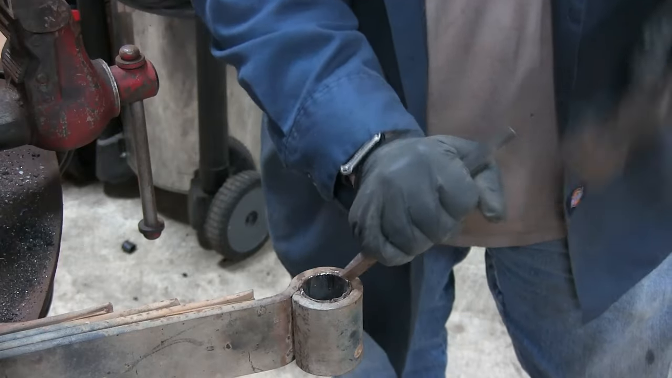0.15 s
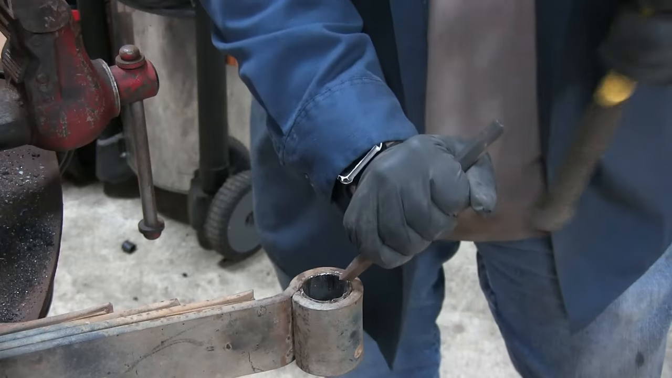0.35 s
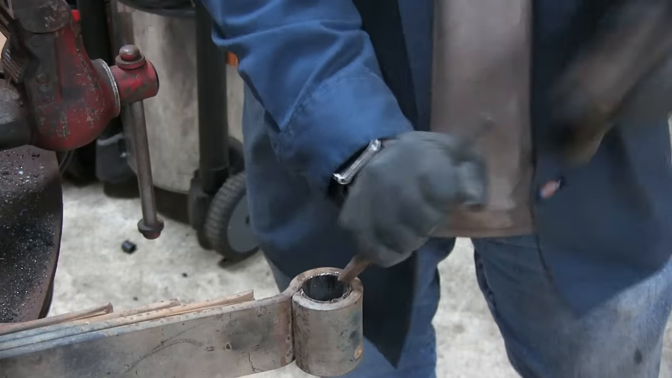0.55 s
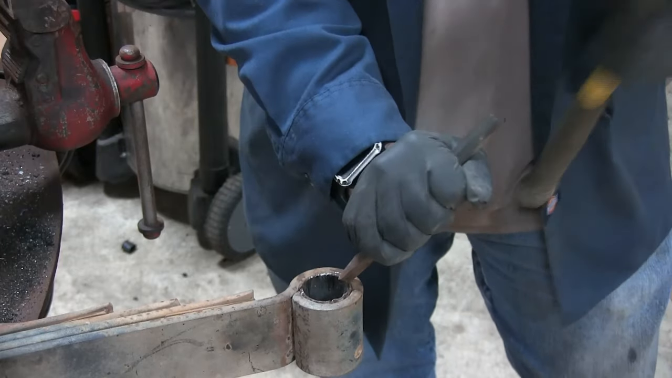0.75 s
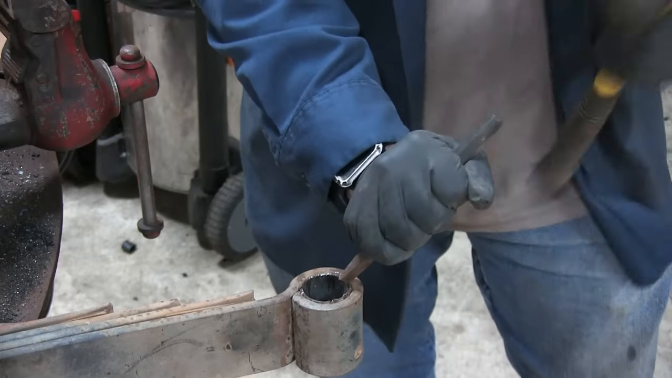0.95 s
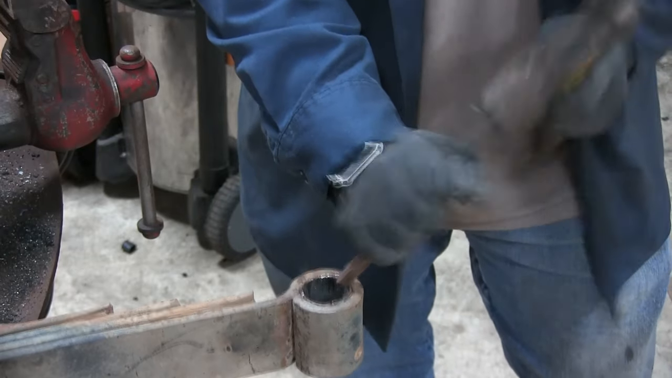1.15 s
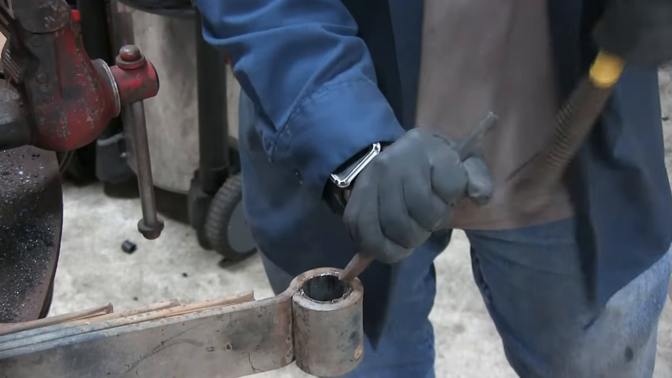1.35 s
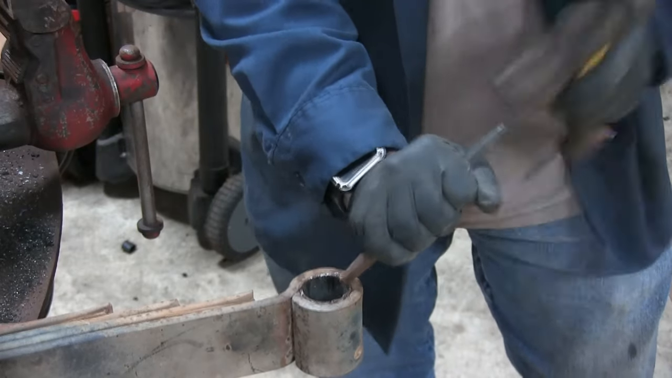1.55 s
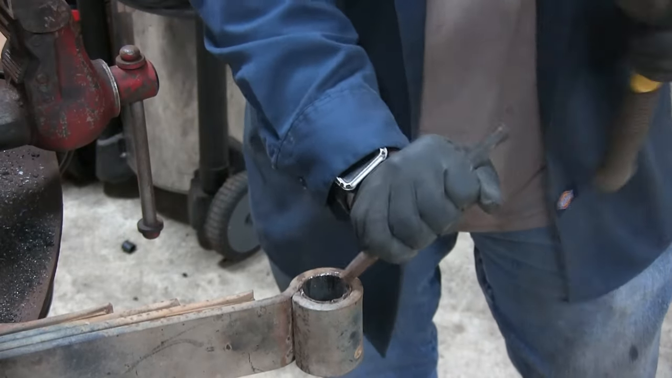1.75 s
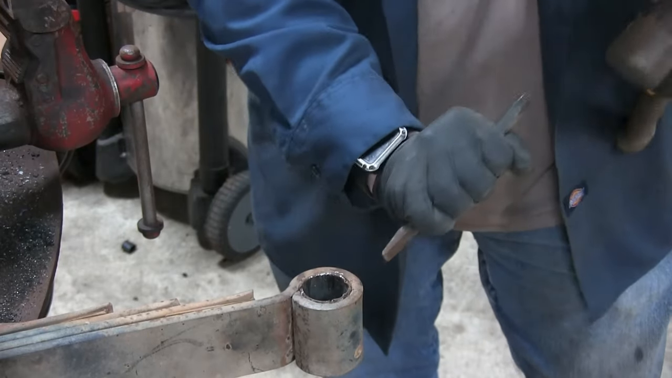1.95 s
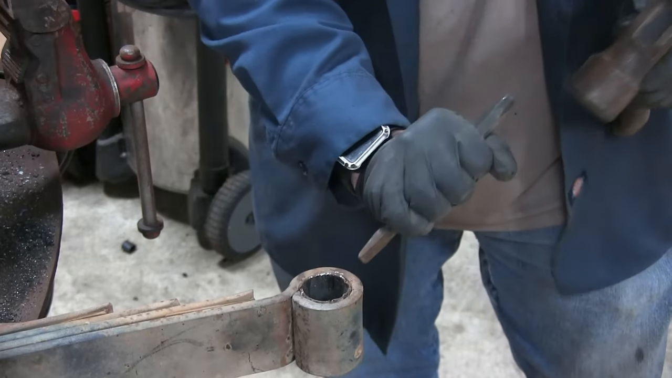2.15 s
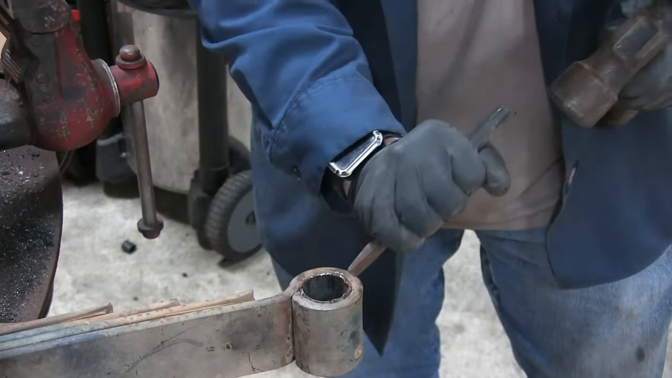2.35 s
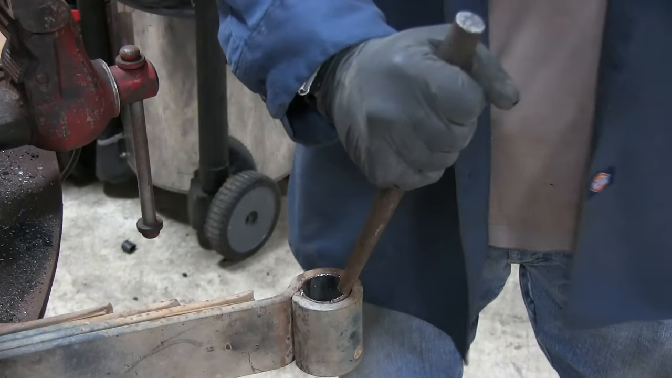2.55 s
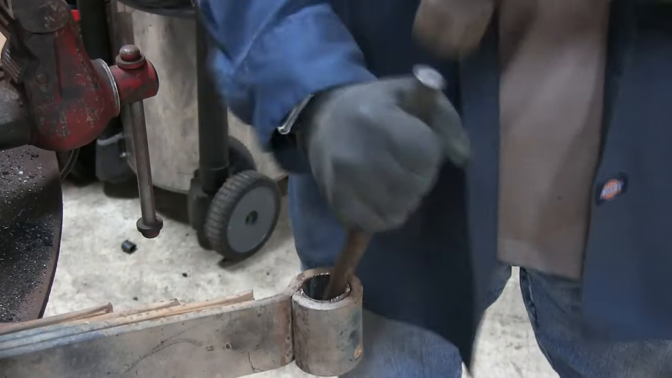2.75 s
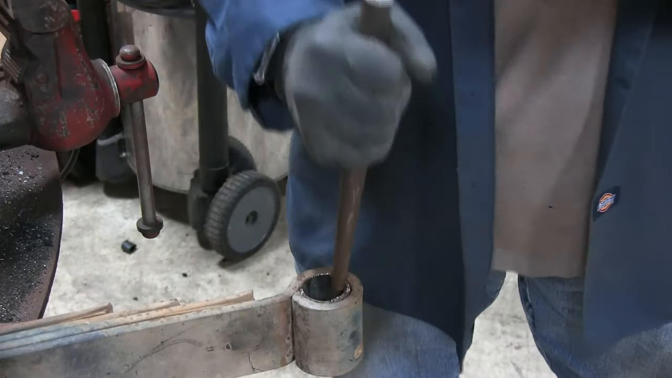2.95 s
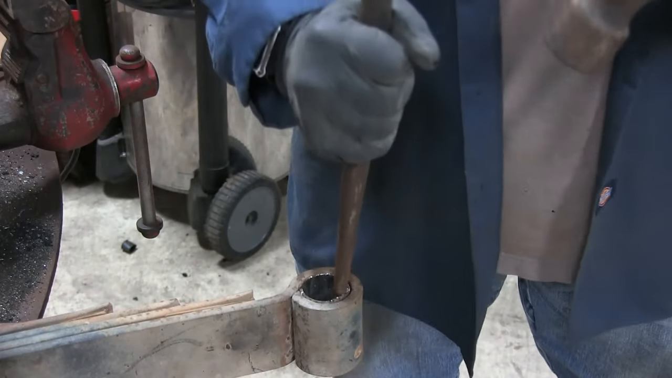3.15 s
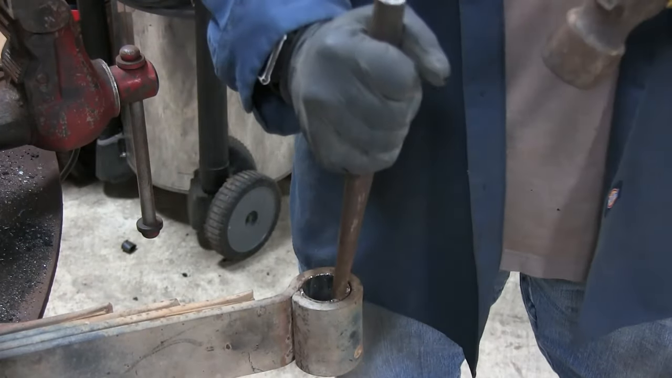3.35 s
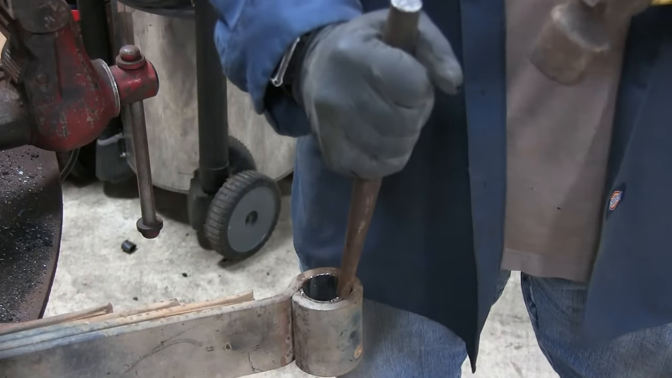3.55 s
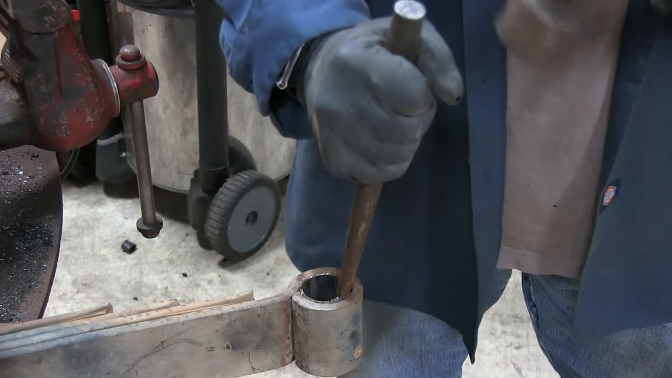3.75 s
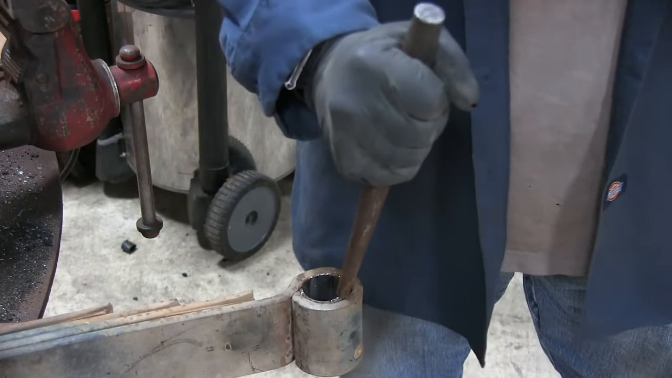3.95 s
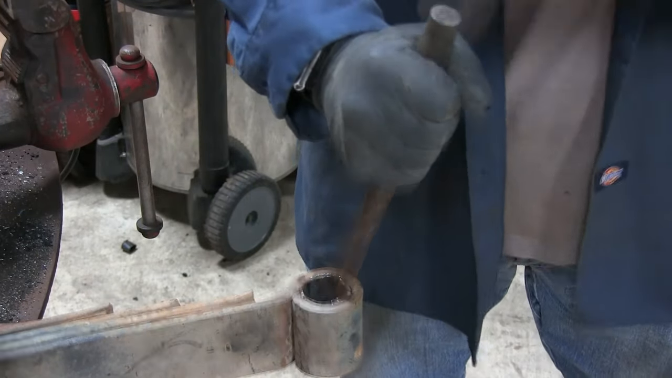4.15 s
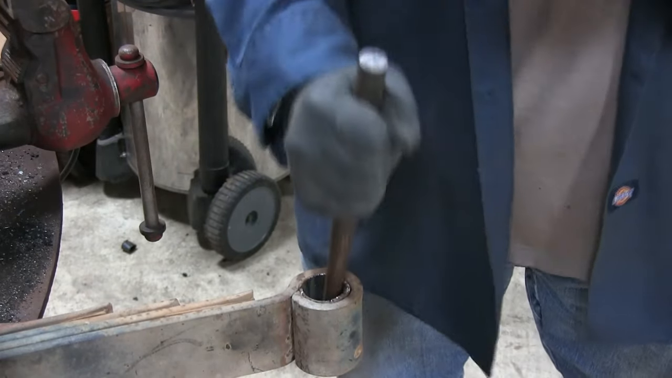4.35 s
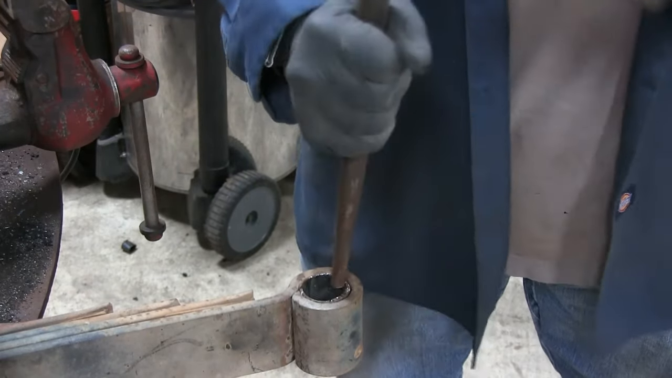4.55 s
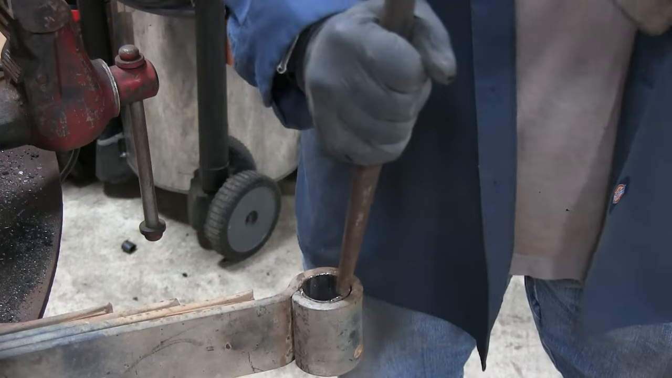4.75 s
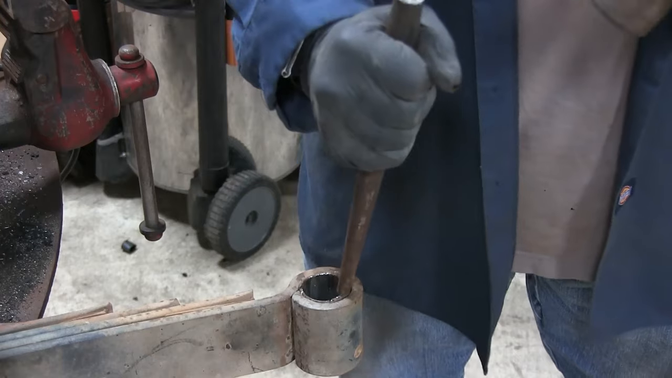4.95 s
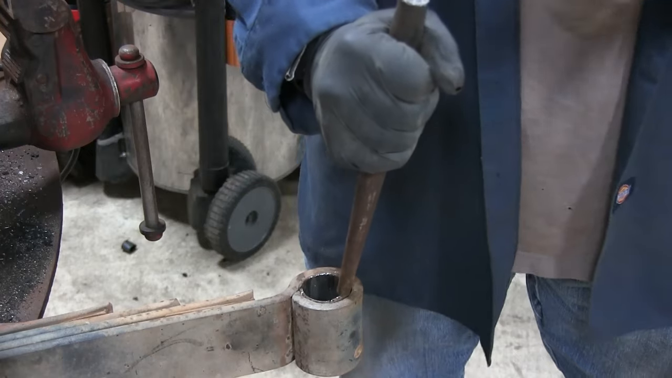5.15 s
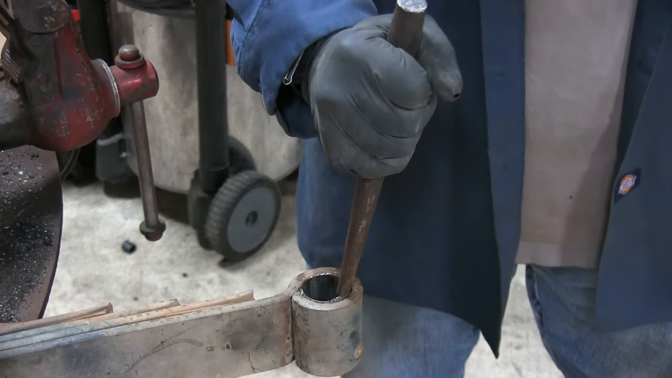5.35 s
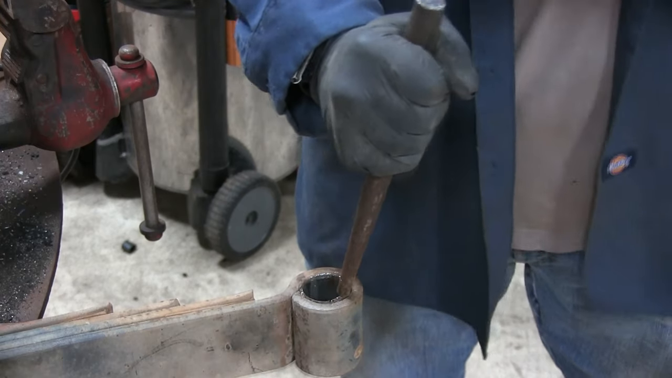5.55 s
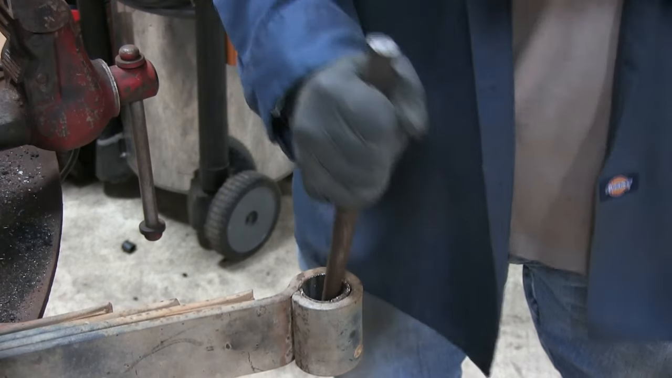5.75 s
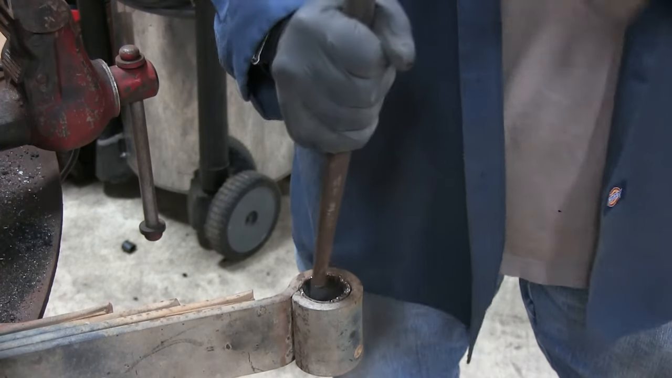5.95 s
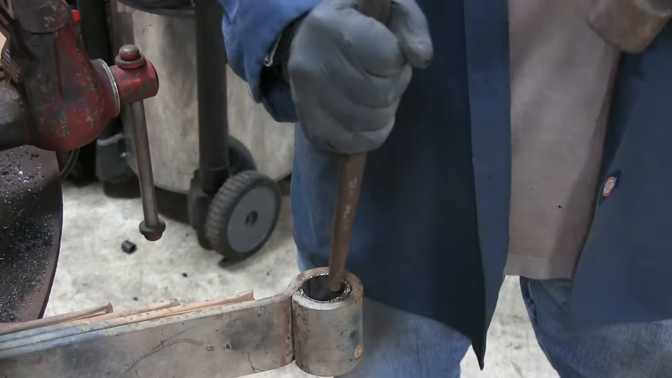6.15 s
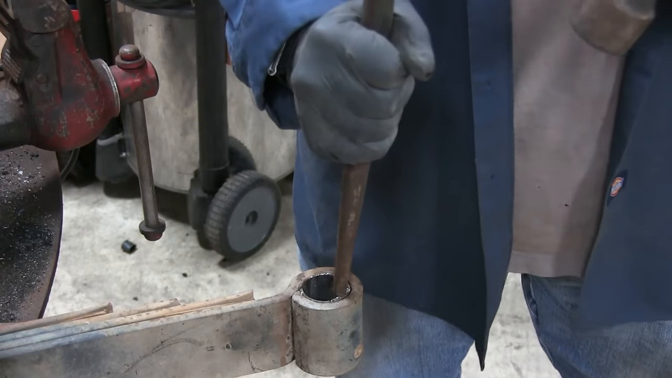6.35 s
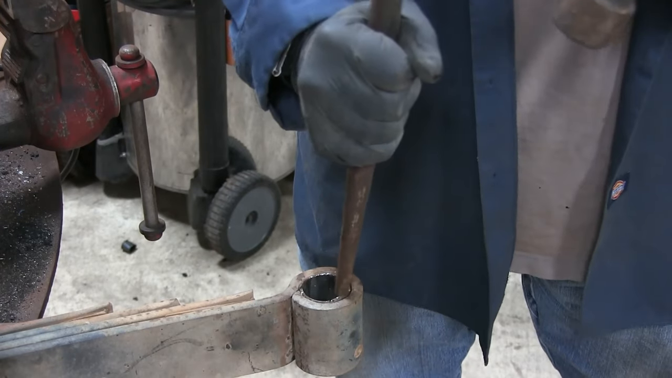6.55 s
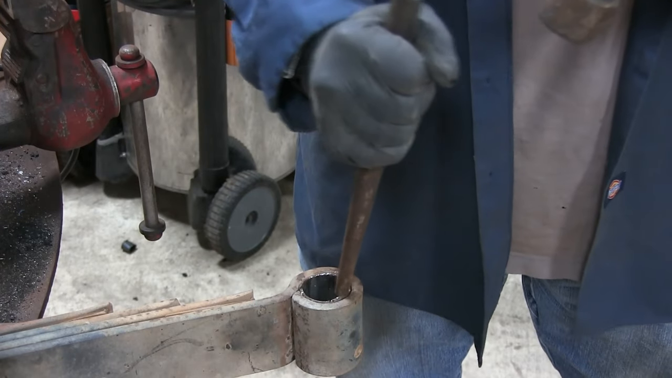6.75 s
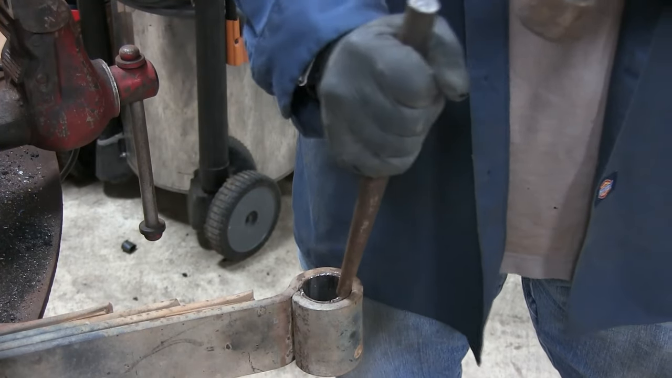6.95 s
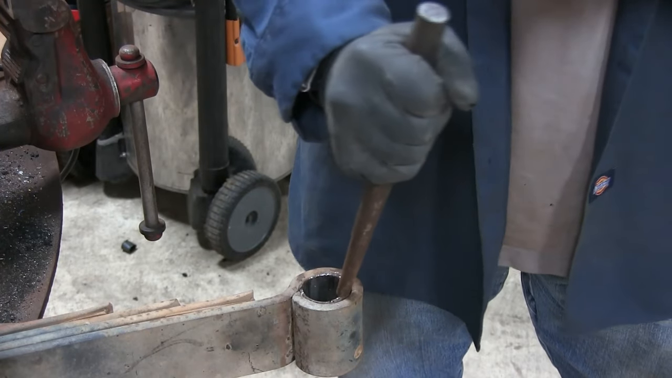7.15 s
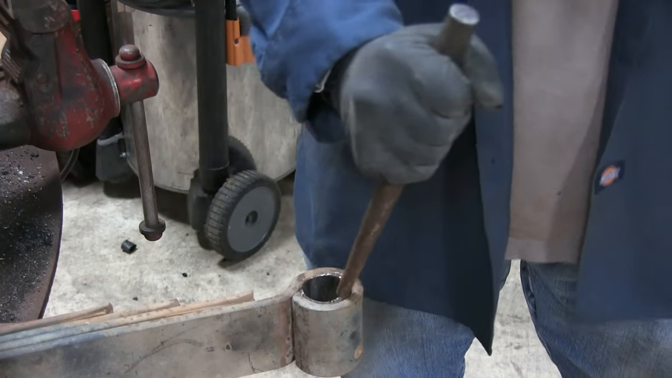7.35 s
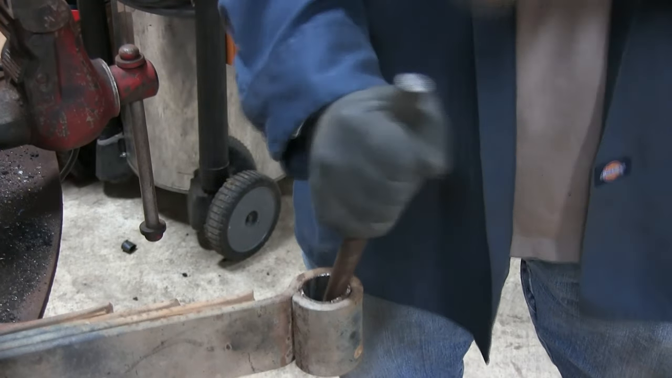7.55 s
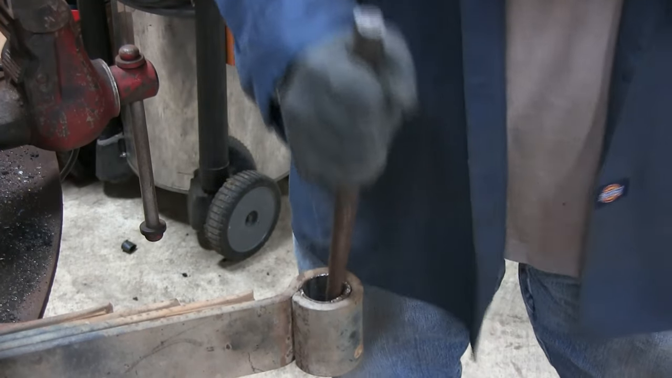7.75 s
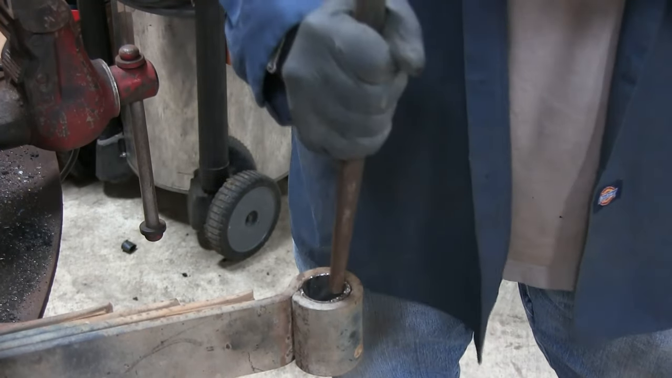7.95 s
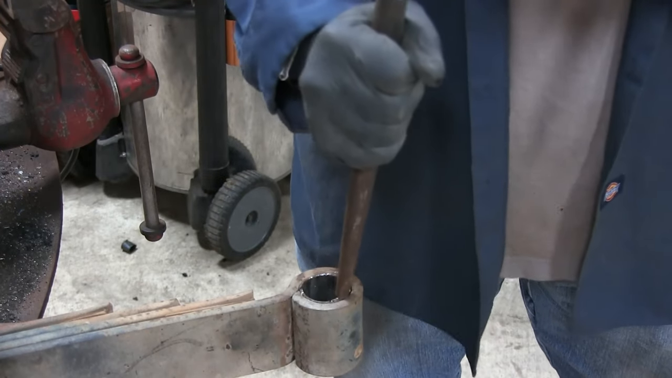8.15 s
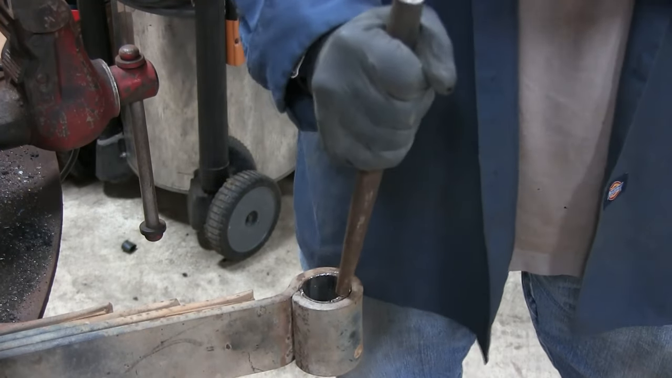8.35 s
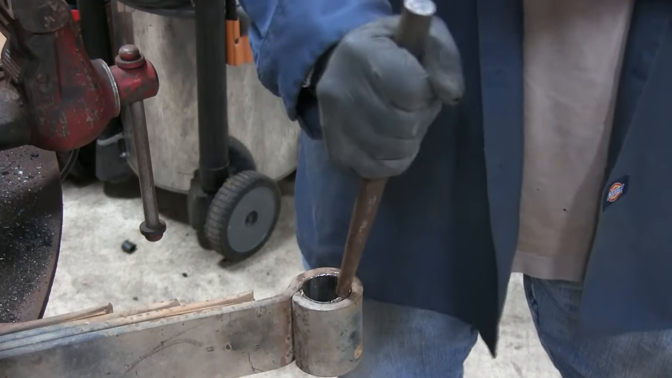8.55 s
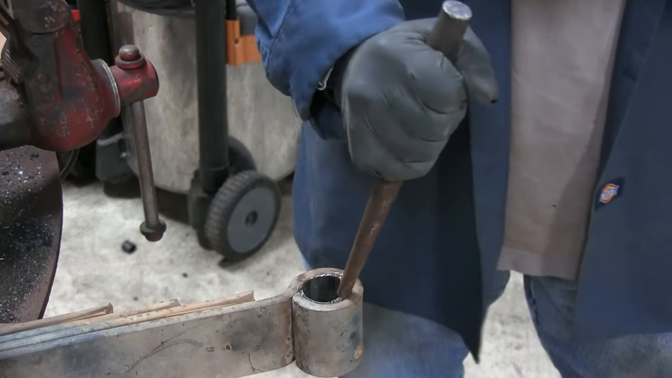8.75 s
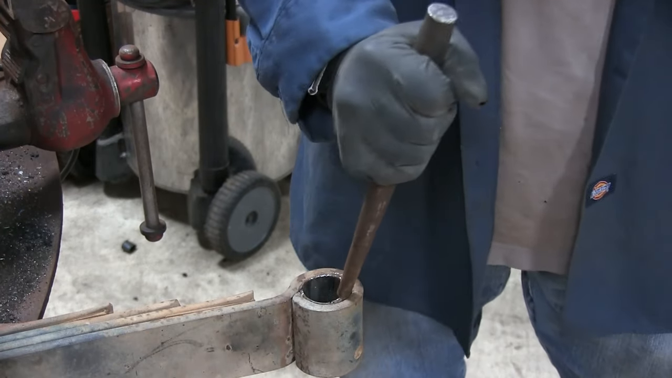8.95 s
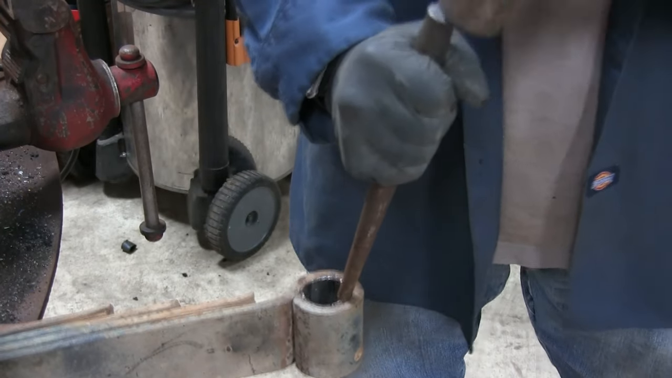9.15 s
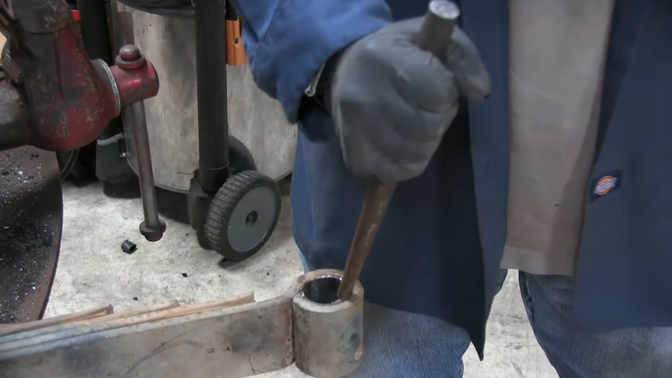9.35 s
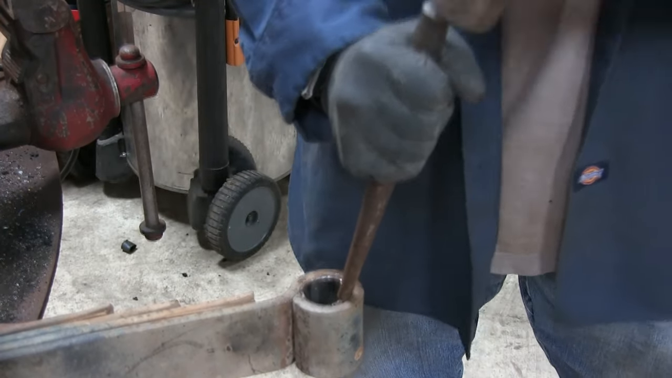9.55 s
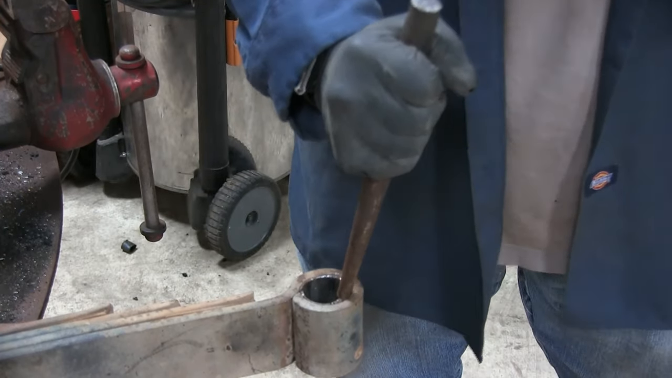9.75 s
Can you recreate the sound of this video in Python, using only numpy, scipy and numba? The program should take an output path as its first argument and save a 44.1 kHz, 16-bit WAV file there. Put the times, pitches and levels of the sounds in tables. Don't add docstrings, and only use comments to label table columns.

```python
import sys
import numpy as np
from scipy import signal
from scipy.fft import rfft, irfft, next_fast_len
from scipy.io import wavfile
from scipy.ndimage import map_coordinates
from numba import njit

SR = 44100
rng = np.random.default_rng(int(sys.argv[2]) if len(sys.argv) > 2 else 0)


def store_wav(level_fs):
    pcm = np.round(np.clip(np.atleast_2d(level_fs), -1, 1) * 32767)
    wavfile.write(sys.argv[1], SR, pcm.T.astype(np.int16))


def volts_from_db(level):
    exponent = np.asarray(level, float) / 20
    return 10 ** exponent


N = 436590

# start in seconds, force in dB, low head ring in dB, high head ring in dB,
# punch ring in dB.
BLOWS = [
    (0.524, -35, -19, -14, -10.5),
    (0.8910, -29.5, 5, -3, 0),
    (1.2282, -27, 1.5, 8.5, 2),
    (1.5767, -26.5, 4, 7.5, -5),
    (2.7087, -25.5, -9.5, -7, 1.5),
    (4.2387, -22.5, -6.5, -26.5, -10),
    (5.6499, -21, -5, -3, -6),
    (7.54, -23.5, 1.5, -1.5, -8),
    (9.2240, -29, -7, -23, 1),
    (9.6175, -31, 6, -5, -8),
]
# frequency in Hz, level in dB, t60 in seconds.
HEAD_LOW = [(5098, -11, .55), (5116, -15, .5), (5790, -26, .3)]
# frequency in Hz, level in dB, t60 in seconds.
HEAD_HIGH = [(8198, -14, .5), (11810, -21, .3), (14100, -34, .2)]
# frequency in Hz, level in dB, t60 in seconds.
PUNCH = [(3474, 2.5, 0.023), (3767, 2.5, .03), (7400, 0.5, 0.02), (10010, -3, 0.016), (11110, -7.5, .03)]
# frequency in Hz, level in dB, t60 in seconds.
SHANK = [(5140, -4, .1), (6305, -2, .12), (8200, -12, .12), (10000, -8, .06), (11815, -14, .1)]
# frequency in Hz, level in dB, t60 in seconds.
PING = [(1500, -3, .018), (2300, -5, .018), (3300, -4, .016), (4500, -8, .015), (5600, -8, .015),
        (7450, -3, .022), (10000, -10, .025)]
# frequency in Hz, width in Hz, level in dB.
SPRING = [(383.7, 37, -0.5), (549, 17, 2.5), (790, 50, -6.5), (913, 19, -10.5), (1309, 70, -0.5),
          (1605, 110, -6.5), (1723, 160, 2), (1845, 43, -1.5)]
# frequency in Hz, density in dB per Hz.
CRACK = [(24, -70.5), (60, -15), (231, -1), (600, -1), (1800, 1.5), (4800, -4.5), (9500, -13),
         (16000, -29.5)]
# frequency in Hz, t60 in seconds.
HALL = [(60, 0.55), (250, 1.005), (1000, 0.92), (2500, 0.88), (5000, 0.79), (9000, 0.57), (15000, 0.34)]
# frequency in Hz, correlation from 0 to 1.
ALIKE = [(60, 0.75), (150, 0.93), (380, 0.88), (950, 0.64), (2380, 0.53), (5980, 0.67), (15000, 0.17)]
# start in seconds, click peak in dB, thud in dB, sleeve ring in dB,
# punch ring in dB.
TAPS = [(0.0024, -53.5, -15, -13, -26), (3.3922, -58, 9, -3, -29), (3.5839, -61, -3, -1, -26),
        (3.9763, -75, -15, -21.5, -20), (4.9457, -42, -4, -3, -12.5), (5.2215, -81, -10, -18.5, -30),
        (6.1547, -56, -7, 2, -23), (6.2025, -50, -2, 6, -26), (6.6046, -45.5, -3, -5.5, -11),
        (6.9256, -45.5, -5, -9.5, -7), (7.2383, -66.5, 4, -8, -18), (7.3313, -63.5, 0.5, -11, -12.5),
        (8.104, -46, 5.5, 5.5, -8.5), (8.3758, -40.5, -2.5, -2.5, -8), (8.4266, -34, -2, -10.5, -13.5),
        (8.644, -73.5, -5, -13, -24.5), (8.674, -56.5, -15, -14, -13)]
# frequency in Hz, level in dB.
CLICK = [(300, 13.5), (1500, 19), (4000, 3), (9000, -11), (13000, -21.5), (16000, -72.5)]
# frequency in Hz, level in dB, t60 in seconds.
SLEEVE = [(500, 7.5, .05), (700, 4, .05), (867, 5, 0.05), (1200, 7, .035), (1500, 4, .03)]
# frequency in Hz, level in dB, t60 in seconds.
CLINK = [(2000, 4, .07), (2540, 0, .03), (2995, 3, .05), (3500, 8, .014), (4400, 0, .012), (5170, -8, .09),
         (6310, -9, .04), (8100, -7, .03), (10000, -6, .02)]
# frequency in Hz, level in dB, t60 in seconds.
LINGER = [(371, -15, 0.89), (886, -9, 0.66), (1163, -11.5, .6), (1335, -1.5, .45), (3040, -12, .4),
          (3197, -13.5, .35), (5400, -19.5, .6)]
# time of peak in seconds, level in dB.
RUBS = [
    (0.01, -68.5),
    (3.42, -58.5),
    (3.63, -67),
    (4.83, -49.5),
    (6.2, -50.5),
    (6.48, -58.5),
    (7.26, -63),
    (8.7, -59.5),
]
# frequency in Hz, density in dB per Hz.
CLOTH = [(100, -6), (300, 6), (600, 8), (1200, -1), (2500, -20), (6000, -29.5), (16000, -56.5)]
# frequency in Hz, density in dB per Hz.
AIR = [(15, -46.5), (25, -32.5), (76, -9.5), (130, -3), (300, -2.5), (1400, -17.5), (6740, -26.5),
       (16000, -36)]
# frequency in Hz, density in dB per Hz.
DRONE = [(15, -50.5), (40, -15.5), (90, -4), (140, -1), (320, -8), (1500, -17.5), (5000, -42),
         (16000, -64.5)]
# start in seconds, end in seconds, lift in dB.
LIFTS = [
    (0, 0.505, 4),
    (2.49, 2.705, 3),
]

LONG = 80000
HZ = np.fft.rfftfreq(LONG, 1 / SR)
T = np.arange(LONG // 2) / SR


def unit(x):
    return x / np.sqrt(np.mean(x ** 2) + 1e-20)


def along(points, hz):
    f, v = np.transpose(points)
    return np.interp(np.log(hz + 1), np.log(f + 1), v)


def spread(pair, hz):
    turn = np.arccos(np.clip(along(ALIKE, hz), -1, 1)) / 2
    mid = pair[0] * np.cos(turn)
    side = pair[1] * np.sin(turn)
    return np.array([mid + side, mid - side])


def causal(db):
    cepstrum = irfft(np.log(volts_from_db(db) + 1e-6))
    cepstrum[1:LONG // 2] *= 2
    cepstrum[LONG // 2 + 1:] = 0
    return np.exp(rfft(cepstrum))


def ring(modes, db):
    drift = 0.02 * np.cumsum(rng.standard_normal((len(modes), len(T))), axis=1)
    body = np.zeros(len(T))
    for (hz, level, t60), turn in zip(modes, drift):
        strength_db = db + level + rng.normal(0, 2.2)
        body += volts_from_db(strength_db - 60 * T / t60) * np.sin(2 * np.pi * hz * T + turn)
    return rfft(body * (1 - np.exp(-T / 0.00046)), LONG)


def burst(t60):
    puff = volts_from_db(-60 * T / t60) * (1 - np.exp(-T / 0.00044)) * rng.standard_normal(len(T))
    return rfft(puff / np.linalg.norm(puff), LONG)


def hall(wet_db):
    gather_s = 0.002
    size = LONG * 3 // 4
    hz, t, z = signal.stft(rng.standard_normal((2, size)), SR, nperseg=256)
    decay = volts_from_db(-60 * t / along(HALL, hz)[:, None])
    tail = signal.istft(z * decay, SR, nperseg=256)[1][:, :size]
    tail = tail * np.clip(np.arange(tail.shape[1]) / SR / gather_s, 0, 1)
    return volts_from_db(wet_db) * spread(rfft(tail / np.linalg.norm(tail[0]), LONG), HZ)


def add(track, s, spectrum):
    part = track[:, round(s * SR):][:, :LONG]
    part += irfft(spectrum, LONG)[:, :part.shape[1]]


def resonance(hz, width):
    return 1j * HZ * width / (hz * hz - HZ * HZ + 1j * HZ * width)


def hammer():
    track = np.zeros((2, N))
    upright_s = 2.5
    near_tilt_db = 2.4
    spring = 1 + volts_from_db(-2.5) * sum(volts_from_db(db) * resonance(hz, width) for hz, width, db in SPRING)
    crack = causal(along(CRACK, HZ)) * spring
    near = causal(along(CRACK, HZ) + near_tilt_db * np.log2((HZ + 50) / 1500))
    for s, force_db, low_db, high_db, punch_db in BLOWS:
        punch = [*PUNCH, *SHANK] if s > upright_s else PUNCH
        rings = ring(HEAD_LOW, low_db - 45.0) + ring(HEAD_HIGH, high_db - 41.0)
        rings = rings + ring(punch, punch_db - 42.5)
        direct = volts_from_db(4.5) * near * burst(0.056) + volts_from_db(-7.5) * rings + ring(PING, -14.5)
        echo = (crack + rings) * hall(10.02)
        add(track, s, volts_from_db(force_db + 35.0) * (direct + echo))
    return track


def taps():
    track = np.zeros((2, N))
    bright = causal(along(CLICK, HZ))
    thud = resonance(480, 250) / (1 + 1j * HZ / 1800) ** 2
    thud = thud * HZ / (HZ - 200j)
    for s, db, thud_db, sleeve_db, punch_db in TAPS:
        steel = ring(SLEEVE, sleeve_db - 19.5) + ring(CLINK, punch_db - 18.5)
        steel = steel + volts_from_db(thud_db + 23.0) * thud
        direct = bright * burst(0.075) + steel
        echo = (bright + steel) * hall(0.4)
        add(track, s, volts_from_db(db + 13) * (direct + echo))
    add(track, 0, ring(LINGER, -61) * (1 + hall(0.5)))
    return track


def rush(spectrum):
    m = next_fast_len(N)
    hz = np.fft.rfftfreq(m, 1 / SR)
    noise = spread(rfft(rng.standard_normal((2, m))), hz)
    return unit(irfft(noise * volts_from_db(along(spectrum, hz)), m)[:, :N])


def swells(events, rise_db_per_s, fall_db_per_s):
    t = np.arange(N) / SR
    power = np.zeros(N)
    for s, db in events:
        slope_db = np.minimum(rise_db_per_s * (t - s), fall_db_per_s * (s - t))
        power += volts_from_db(2 * (db + slope_db))
    return np.sqrt(power)


def shuffle():
    catches = map_coordinates(rng.standard_normal(N // 700 + 4), [np.arange(N) / 700])
    return swells(RUBS, 145, 67) * volts_from_db(3.4 * catches) * rush(CLOTH)


def workshop():
    t = np.arange(N) / SR
    hush_db, stir_db = -71, -39
    stirred = swells([(s + .05, db + stir_db) for s, db, *_ in BLOWS], 400, 15)
    lift_db = sum(db * ((t >= start) & (t < end)) for start, end, db in LIFTS)
    return volts_from_db(hush_db + lift_db) * rush(AIR) + stirred * rush(DRONE)


def scene():
    return (hammer() + taps() + shuffle() + workshop()) * volts_from_db([[.7], [-.7]])


@njit
def follow(power, rise, fall):
    out = np.zeros(len(power))
    for i in range(1, len(power)):
        rate = rise if power[i] > out[i - 1] else fall
        out[i] = out[i - 1] + rate * (power[i] - out[i - 1])
    return out


def low_pass(x):
    return signal.sosfilt(signal.butter(12, 16510, fs=SR, output="sos"), x)


def record(dry):
    rise_s, fall_s = 0.0076, 0.023
    power = np.mean(dry ** 2, axis=0)
    level = np.sqrt(follow(power, 1 / (rise_s * SR), 1 / (fall_s * SR)) + 1e-12)
    x = dry * np.minimum(1, volts_from_db(-33.0) / level)
    ceiling = volts_from_db(-19.5)
    x = x / (1 + np.abs(x / ceiling) ** 4) ** .25
    band = signal.butter(2, [67.5, 15000], "bandpass", fs=SR, output="sos")
    x = signal.sosfilt(band, x)
    return low_pass(x)


dry = scene()
out = record(dry)
store_wav(out)
```